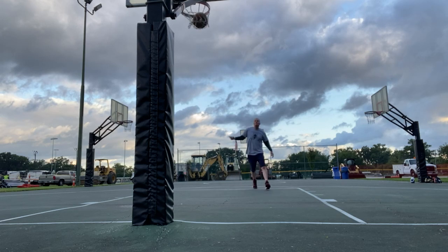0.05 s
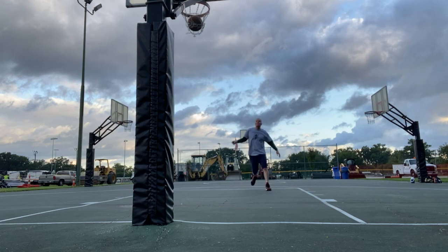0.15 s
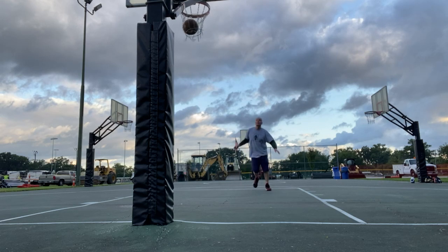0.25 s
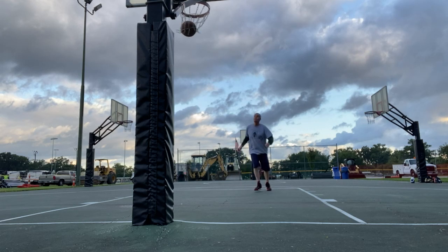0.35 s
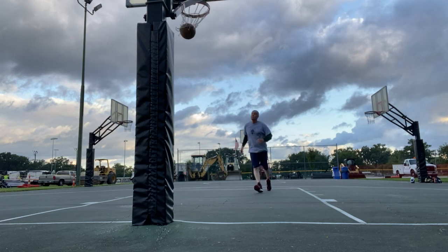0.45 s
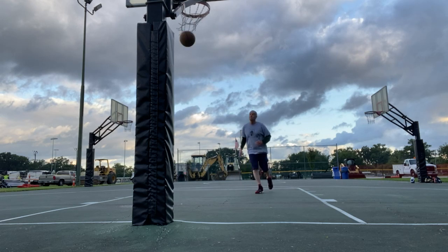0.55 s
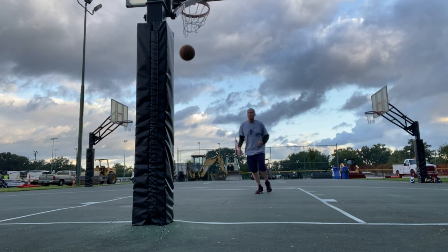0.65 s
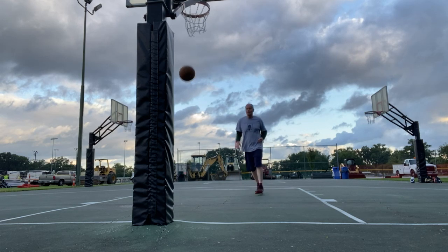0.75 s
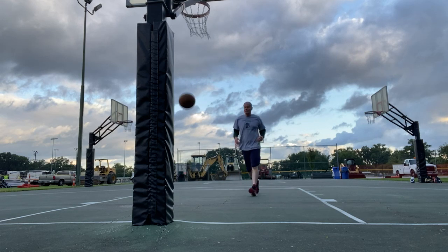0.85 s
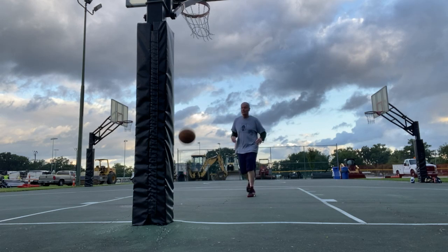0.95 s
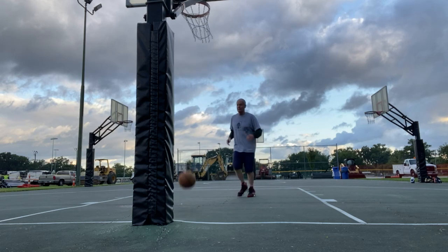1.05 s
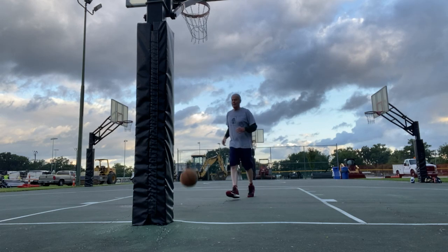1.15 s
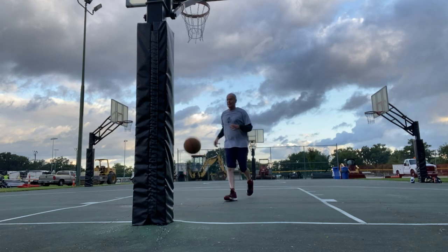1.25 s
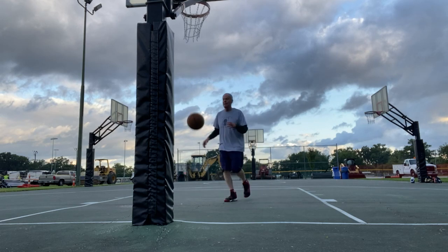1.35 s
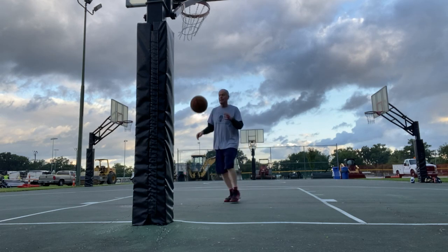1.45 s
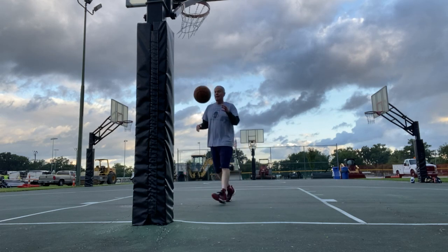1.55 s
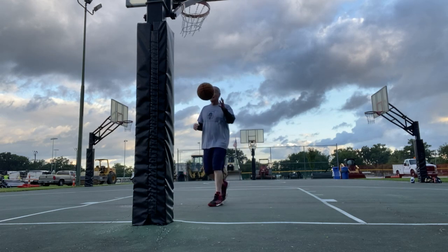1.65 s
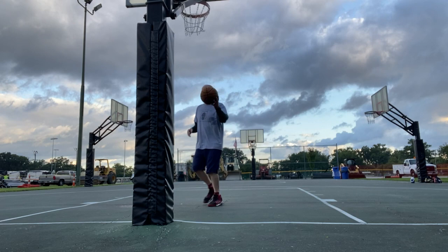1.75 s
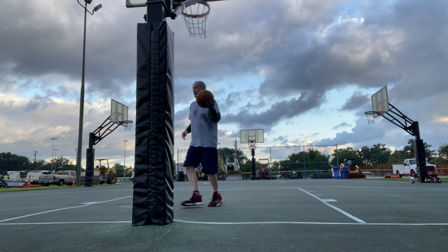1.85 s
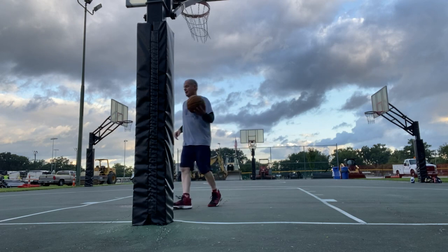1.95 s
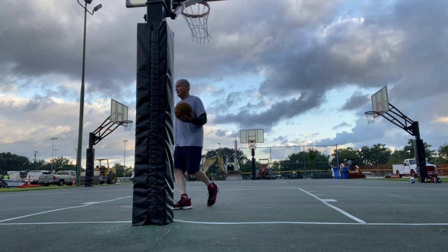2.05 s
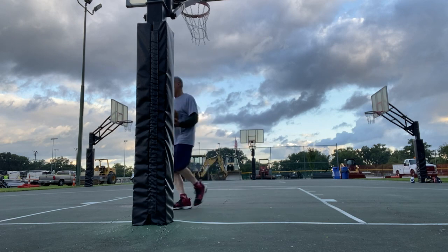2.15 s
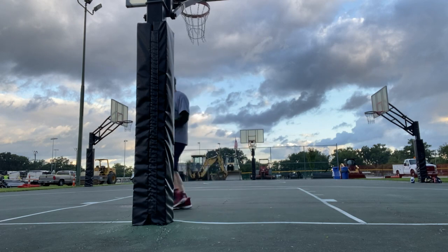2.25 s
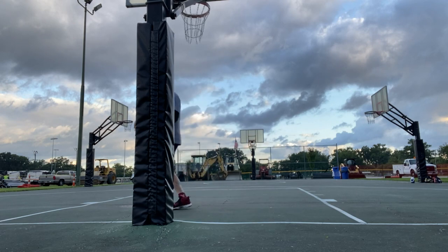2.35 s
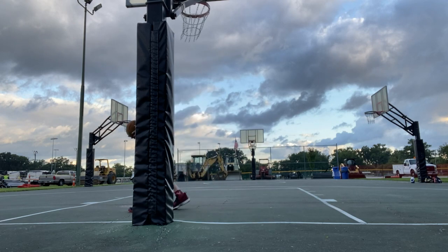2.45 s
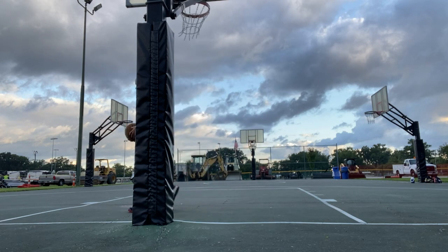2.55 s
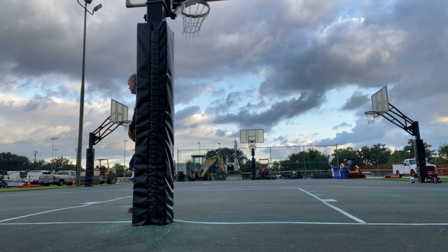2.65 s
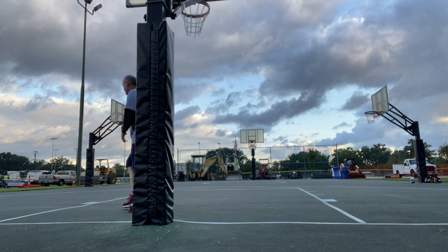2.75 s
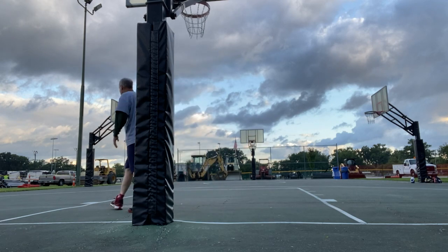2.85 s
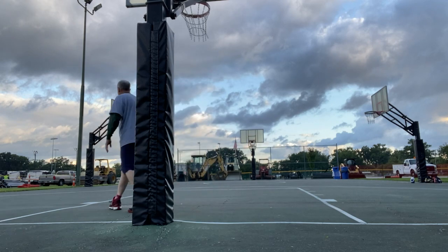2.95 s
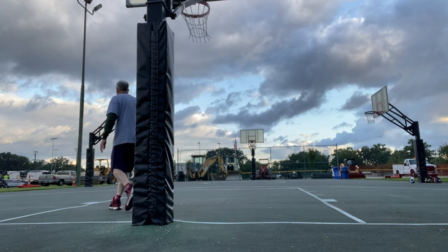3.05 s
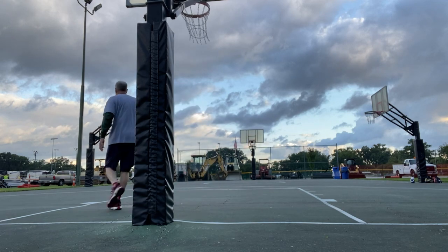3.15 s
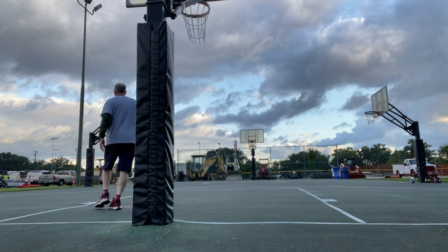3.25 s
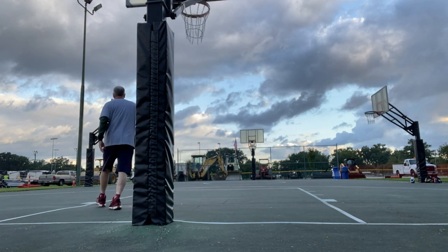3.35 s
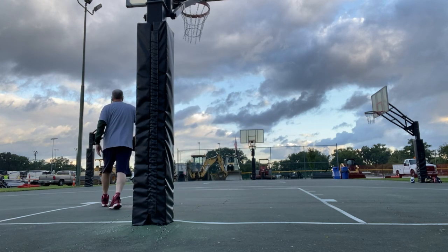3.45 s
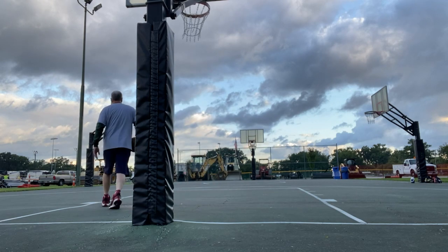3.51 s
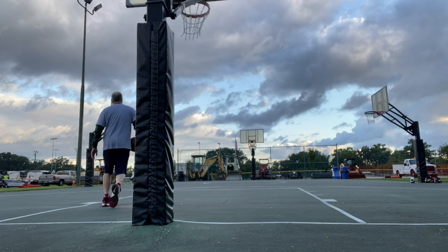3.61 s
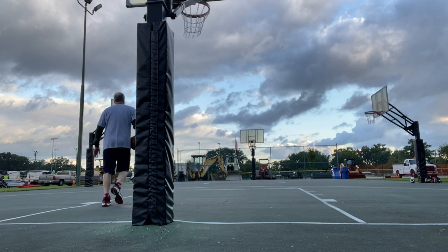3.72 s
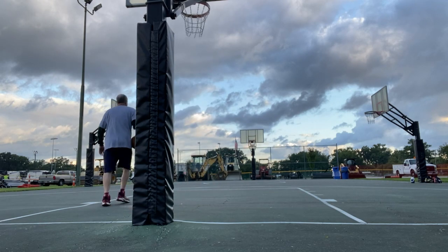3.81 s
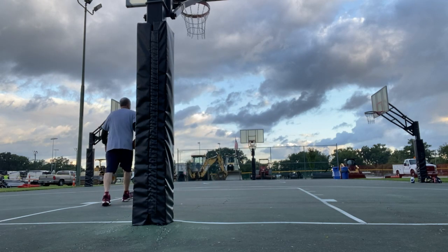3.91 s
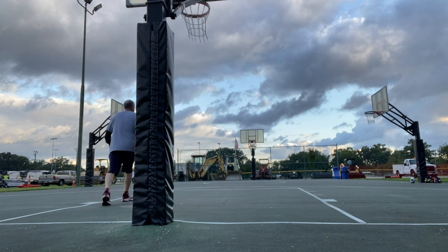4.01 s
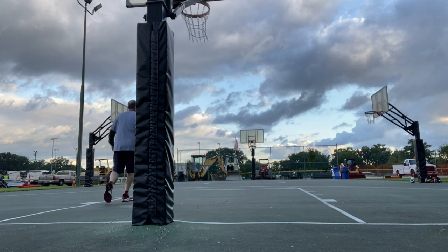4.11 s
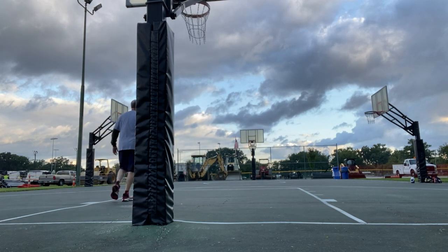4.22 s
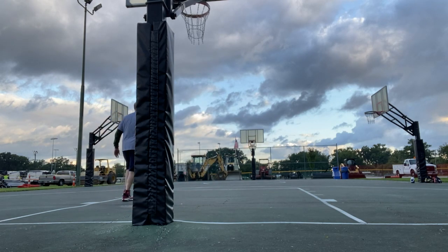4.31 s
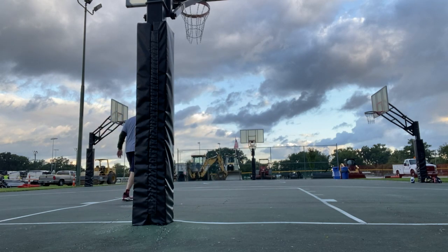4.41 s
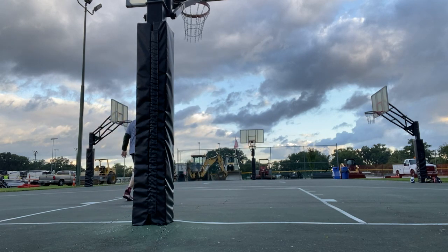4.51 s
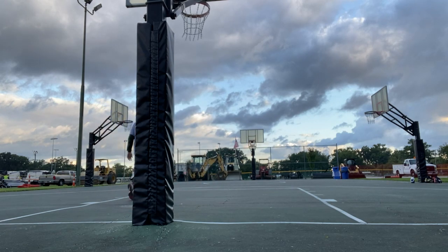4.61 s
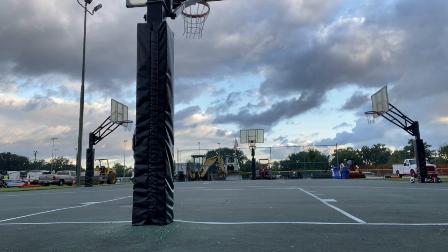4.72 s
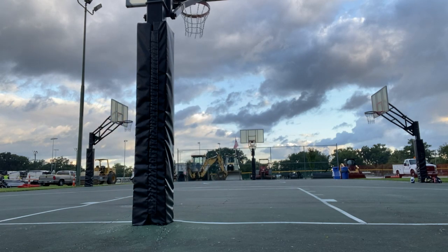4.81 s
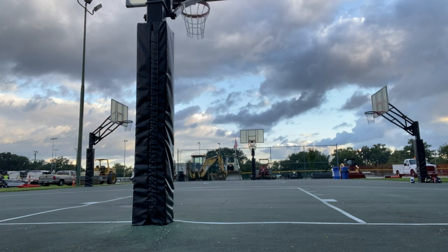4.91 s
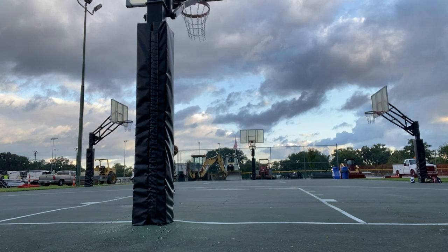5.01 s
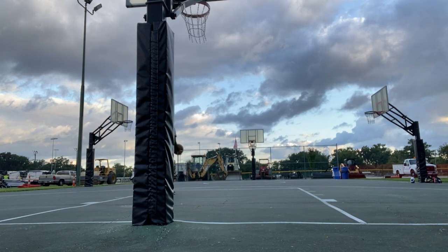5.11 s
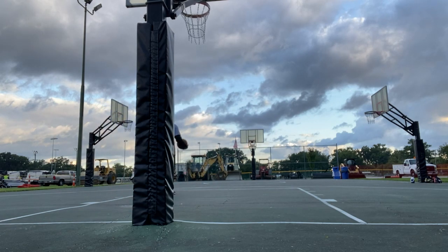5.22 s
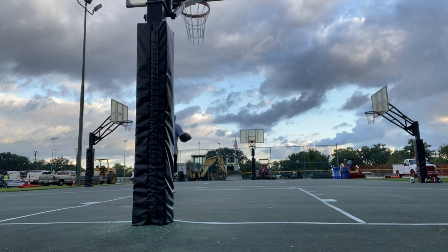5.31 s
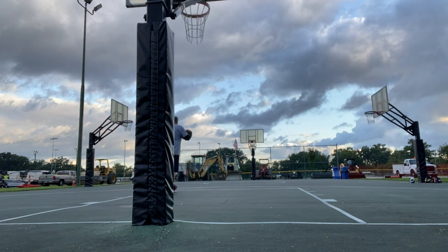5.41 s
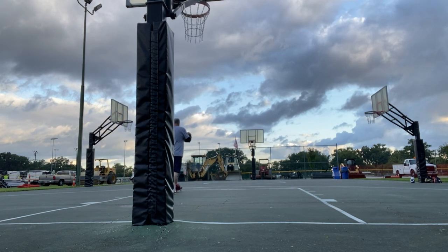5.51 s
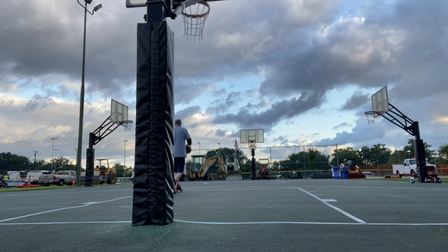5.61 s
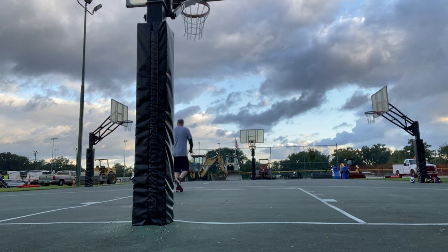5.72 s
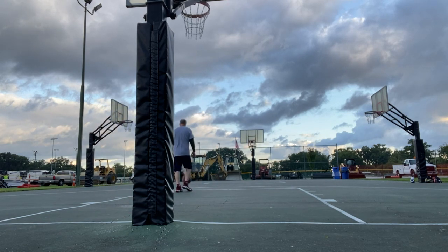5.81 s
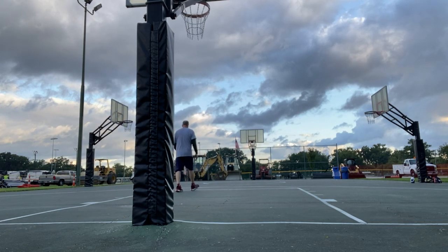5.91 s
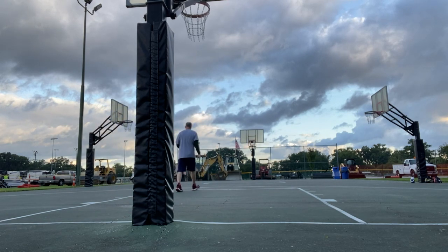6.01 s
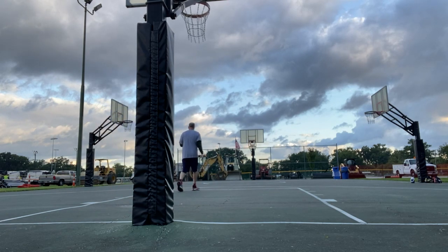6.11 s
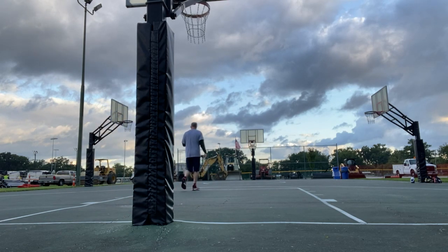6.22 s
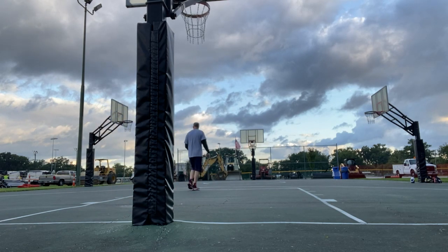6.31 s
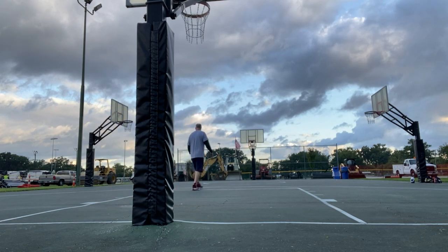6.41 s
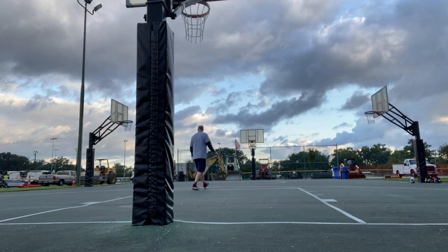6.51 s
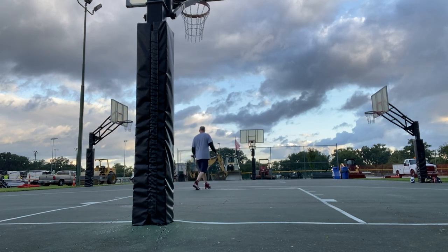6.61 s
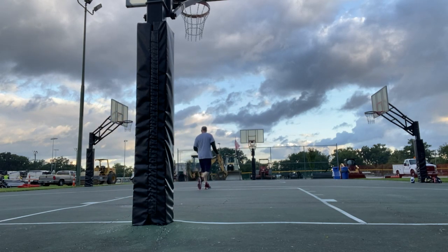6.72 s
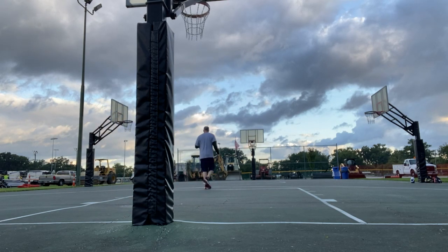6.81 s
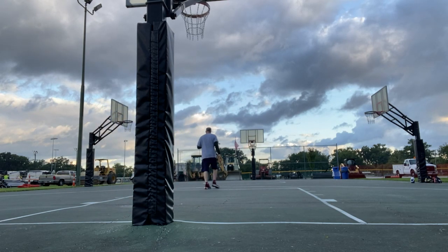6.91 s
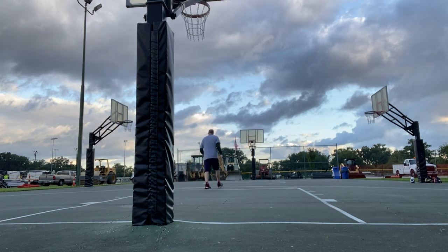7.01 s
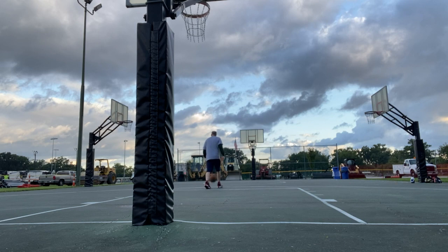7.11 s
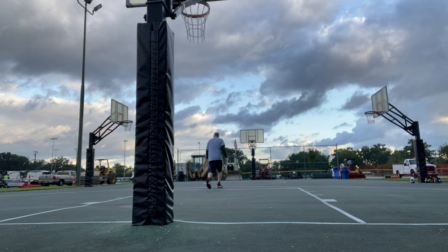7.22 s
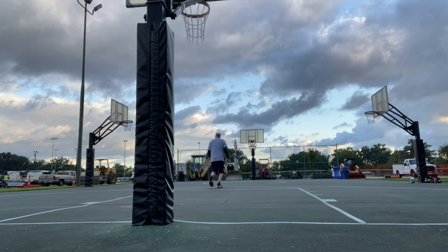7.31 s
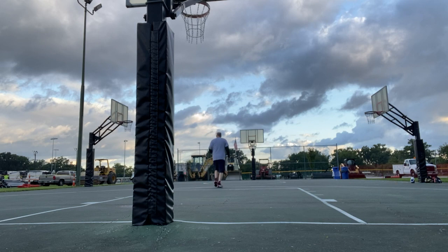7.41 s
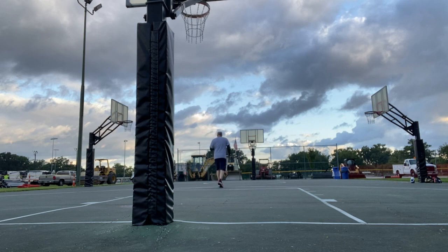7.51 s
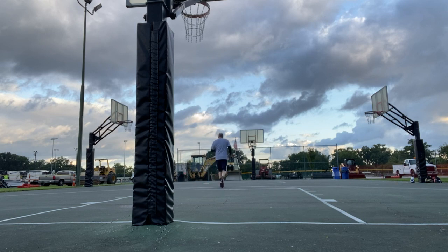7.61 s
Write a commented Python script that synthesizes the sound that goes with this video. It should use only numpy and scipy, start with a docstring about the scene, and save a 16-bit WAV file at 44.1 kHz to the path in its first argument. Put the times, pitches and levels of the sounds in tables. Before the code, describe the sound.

A basketball rattles through a rim, its steel net jingling, then one loud close bounce, a catch, and three later receding bounces over traffic rumble.

```python
"""On an outdoor court a basketball drops through a hoop: the rim rattles and the swinging steel net jingles.
The ball lands once close by and is caught; later it is bounced three times while the player walks away.
Knocks, links and ball are struck modes, pulses and shaped noise; brushes and rattles are random impacts.
Distant traffic, made of slowly varying noise, rumbles throughout with a faint sinusoidal machine whine.
Fences and trees return a soft echo of the bounces, made with decaying noise."""
import sys
import numpy as np
from scipy import signal
from scipy.fft import rfft, irfft, next_fast_len
from scipy.io import wavfile
from scipy.ndimage import map_coordinates

SR = 44100
rng = np.random.default_rng(int(sys.argv[2]) if len(sys.argv) > 2 else 0)


def master(y):
    """Save y as 16-bit WAV."""
    cut = np.clip(np.atleast_2d(y).T, -1, 1)
    pcm = np.round(cut * 32767)  # scale
    wavfile.write(sys.argv[1], SR, pcm.astype(np.int16))


N = 337806  # samples in the scene


def amp(db):
    """Level law: decibels to amplitude ratio."""
    return 10 ** (np.asarray(db) / 20)


def unit(x):
    """Normalization: scale to rms 1."""
    return x / np.sqrt(np.mean(x ** 2) + 1e-20)


def bell(t, centre, width):
    """Gaussian envelope: a smooth hump of height 1; width is the standard deviation."""
    return np.exp(-.5 * ((t - centre) / width) ** 2)


def along(points, hz):
    """Spectral envelope: (Hz, value) points joined on a log-frequency axis."""
    point_hz, value = np.transpose(points)
    return np.interp(np.log(hz + 1), np.log(point_hz + 1), value)


def curves(rows):
    """Slow modulation: each column after the time, interpolated to one value per sample."""
    s, *columns = np.transpose(rows)
    return [np.interp(np.arange(N) / SR, s, column) for column in columns]


def wobble(rate):
    """Random modulation: a smooth curve through rate random knots a second."""
    knots = rng.standard_normal(int(N * rate / SR) + 4)
    return map_coordinates(knots, [np.arange(N) * rate / SR])


def filtered(x, response):
    """Linear filtering: the spectrum of x times a complex response of frequency."""
    n = x.shape[-1]
    m = next_fast_len(n + SR // 2)
    hz = np.fft.rfftfreq(m, 1 / SR)
    return irfft(rfft(x, m) * response(hz), m)[..., :n]


def coloured(x, spectrum):
    """Spectral shaping: x weighted by (Hz, dB) points, at rms 1."""
    return unit(filtered(x, lambda hz: amp(along(spectrum, hz))))


def resonant(x, modes):
    """Forced resonance: x drives parallel (Hz, width Hz, dB) band-pass modes, at rms 1."""
    def response(f):
        return sum(amp(db) * 1j * f * width / (centre * centre - f * f + 1j * f * width)
                   for centre, width, db in modes)
    return unit(filtered(x, response))


def click(spectrum, bright_hz, lag_cycles, size=4096):
    """Dispersion: a pulse of peak 1 whose phase lag grows with log frequency, so low frequencies arrive late."""
    hz = np.fft.rfftfreq(size, 1 / SR)
    gain = amp(along(spectrum, hz)) / np.hypot(1, hz / bright_hz)
    lag = 2 * np.pi * lag_cycles * np.log(hz + 200)
    pulse = irfft(gain * np.exp(-1j * lag))
    pulse = np.roll(pulse, 10)[:size // 4]
    return pulse / np.abs(pulse).max()


def ring(modes, t, scatter_db, detune, build):
    """Free vibration: (Hz, dB, t60 s) modes with random strength and tuning, building up then decaying."""
    total = 0
    for hz, db, t60 in modes:
        decay = amp(db + scatter_db * rng.normal() - 60 * t / t60)
        onset = 1 - np.exp(-t / (build * t60))
        total = total + decay * onset * np.sin(2 * np.pi * hz * (1 + detune * rng.normal()) * t)
    return total


def add(track, s, x):
    """Superposition: mix x into the track from time s."""
    part = track[max(round(s * SR), 0):][:len(x)]
    part += x[:len(part)]


def placed(x, lead_ms, pan_db):
    """Interaural cues: left leads right by lead_ms and is pan_db louder."""
    side = np.array([[.5], [-.5]])
    return amp(side * pan_db) * filtered(x, lambda hz: np.exp(2j * np.pi * hz * side * lead_ms / 1000))


def contacts(rate, spread_db):
    """Random impact process: tiny impacts of uneven size and either sign, about rate a second."""
    hits = rng.random(N) < rate / SR
    return hits * rng.choice([-1, 1], N) * amp(spread_db * rng.standard_normal(N))


def clumps():
    """Clustered contact: an uneven gain, since loose parts touch in bunches."""
    clump_db, clumps_per_s = 2.5, 45
    return amp(clump_db * wobble(clumps_per_s))


# Left-right correlation of the far sound, limited to 0.96 in use: pitch_hz, likeness (0-1)
LIKENESS = [(60, 0.96), (200, 0.94), (500, 0.29), (1000, 0.47), (2000, 1), (4000, 0.31), (8000, 0.91),
            (14000, 0.21)]


def far_noise(spectrum):
    """Partial coherence: stereo noise of rms 1 from beyond the court, its likeness set by frequency."""
    a, b = coloured(rng.standard_normal((2, N)), spectrum)

    def turn(hz):
        return np.arccos(np.clip(along(LIKENESS, hz), -.96, .96)) / 2
    mid = filtered(a, lambda hz: np.cos(turn(hz)))
    side = filtered(b, lambda hz: np.sin(turn(hz)))
    return unit(np.array([mid + side, mid - side]))


# Engine rumble through time, before a common lift: time_s, level_db
RUMBLE_LEVEL = [(0, -33), (1.1, -32), (2.2, -33), (3.8, -35), (7.66, -34)]
# Hiss through time: time_s, level_db
HISS_LEVEL = [(0, -72.5), (2.2, -68), (4.7, -67), (7.66, -72.5)]
# Spectra of engine rumble, tyre roar and hiss: pitch_hz, level_db
RUMBLE_SPECTRUM = [(12, -57.5), (20, -32.5), (27, -23), (29, -18.5), (40, -15.5), (59, 1), (113, -3),
                   (145, -1), (167, -6.5), (198, -5.5), (264, -8), (333, -18.5), (375, -18.5), (450, -25),
                   (580, -51), (990, -120)]
ROAR_SPECTRUM = [(250, -34.5), (420, 0.5), (542, -4), (588, -3), (823, -2), (1370, -4), (1490, -6),
                 (1530, -5.5), (2830, -15.5), (4800, -29), (6240, -60), (10600, -120)]
HISS_SPECTRUM = [(3000, -54), (4500, -1.5), (5400, 1.5), (6700, 0), (8000, -6), (9400, -9.5), (10500, -27),
                 (13500, -15.5), (16000, -45.5)]
RUMBLE_LIFT_DB, RUMBLE_WAVER_DB = 3.5, .7
ROAR_DB, ROAR_FADE_DB_PER_S, ROAR_WAVER_DB = -44, 0.31, .5  # the tyre roar slowly recedes
WHINE_HZ, WHINE_DB, WHINE_WAVER_DB = 1441, -8.5, 1.3  # level against the roar


def traffic():
    """Superposed distant sources: rumble, roar and hiss as noise, and a whine of two wavering harmonics."""
    rumble_db, = curves(RUMBLE_LEVEL)
    hiss_db, = curves(HISS_LEVEL)
    roar_db = ROAR_DB - ROAR_FADE_DB_PER_S * np.arange(N) / SR
    rumble_gain = amp(rumble_db + RUMBLE_LIFT_DB + RUMBLE_WAVER_DB * wobble(11))
    rumble = placed(rumble_gain * far_noise(RUMBLE_SPECTRUM), lead_ms=0, pan_db=-1.95)
    roar_gain = amp(roar_db + ROAR_WAVER_DB * wobble(5))
    roar = placed(roar_gain * far_noise(ROAR_SPECTRUM), lead_ms=0, pan_db=-1.3)
    hiss = placed(amp(hiss_db) * far_noise(HISS_SPECTRUM), lead_ms=0, pan_db=-3)
    # the whine wavers in pitch both slowly and quickly
    phase = 2 * np.pi * np.cumsum(WHINE_HZ + 3 * wobble(14) + 4 * wobble(70)) / SR
    harmonics = np.sin(phase) + amp(-20.5) * np.sin(2 * phase)
    whine = amp(roar_db + WHINE_DB + WHINE_WAVER_DB * wobble(6.2)) * harmonics
    return placed(rumble + roar + hiss + whine, lead_ms=.136, pan_db=0)


# Hands on the ball and soles on the court: centre_s, level_db, length_s (standard deviation)
BRUSHES = [(1.397, -58.5, .002), (1.8, -59, 0.0055), (1.952, -49.5, 0.005), (1.965, -49, .008),
           (2.428, -58, 0.01), (2.528, -64.5, 0.0095), (5.65, -65, 0.013), (7.103, -59.5, 0.0026),
           (7.117, -57.5, .007)]
# Spectrum of the brushes: pitch_hz, level_db
BRUSH_SPECTRUM = [(100, -26), (500, -3.5), (2500, 0), (4000, -3), (5300, -12), (9000, -1.5), (10500, -23),
                  (13000, -7), (15500, -20)]
# Heavy footfalls: start_s, level_db
FOOTFALLS = [(1.269, -18.5), (1.501, -18), (1.911, -20.5), (2.321, -21), (4.288, -23)]


def player():
    """Friction and impact: brushes are bursts of tiny contacts, footfalls two low damped modes."""
    t = np.arange(N) / SR
    touch = sum(amp(db) * bell(t, s, length) for s, db, length in BRUSHES)
    brushes = touch * coloured(contacts(rate=1800, spread_db=5), BRUSH_SPECTRUM)
    ground = [(69.5, 1.2, 0.2), (92.9, -1.0, 0.39)]  # pitch_hz, level_db, t60_s
    thuds = np.zeros(N)
    for s, db in FOOTFALLS:
        thud = ring(ground, t[:SR // 2], scatter_db=0.5, detune=0.059, build=0.049)
        add(thuds, s, amp(db) * thud)
    return placed(brushes + thuds, lead_ms=-0.026, pan_db=-2.5)


# The ball knocking about in the hoop, levels before the trims of each part:
# start_s, backboard_db, rim_rattle_db, ball_bump_db, rim_ring_db
KNOCKS = [(0.003, -36, -36.5, -36, -49), (0.074, -40, -42.5, -34, -56), (0.179, -45, -57, -36, -64),
          (0.191, -49, -50.5, -32, -64), (0.268, -50.5, -48, -48, -53), (0.283, -46, -51, -39, -58),
          (0.315, -52, -39.5, -46, -61), (0.425, -45, -65, -37, -66), (0.47, -48.5, -53, -37, -59),
          (0.604, -54, -46.5, -50, -60)]
# The ball scraping round the rim: centre_s, level_db, length_s (standard deviation)
RIM_SCRAPES = [(0.03, -40.5, .024), (0.277, -47, 0.0172), (0.335, -49.5, .012), (0.49, -62.5, 0.041),
               (0.612, -56.5, .014)]
# Backboard modes: pitch_hz, width_hz, level_db
BOARD_MODES = [(343, 18, 3), (430, 22, -2), (480, 22, 4.5), (571, 22, 0), (593, 22, -0.5), (725, 32, 4.5),
               (780, 30, -6), (1185, 23, -4.5)]
# Ringing modes of the steel rim: pitch_hz, level_db, t60_s
RIM_RING_MODES = [(1182, 0.5, 0.67), (2215, -1, .7), (2654, -6, .4), (2930, -4, .5), (3342, -0.5, .45),
                  (3405, -5, .3), (4910, -13, .4)]
# Broad resonances of the rattled or scraped steel: pitch_hz, width_hz, level_db
STEEL_MODES = [(1952, 147, -7), (2112, 120, -7), (2750, 407, -9), (3370, 59.5, -2), (3800, 400, -16)]
# Spectra of the loose rattle and of rubber bumping steel: pitch_hz, level_db
RATTLE_SPECTRUM = [(60, -32), (200, -17.5), (400, 14), (800, 1.5), (1600, -5), (3200, -13.5), (5000, -27.5),
                   (8000, -35), (12000, -72.5)]
BUMP_SPECTRUM = [(100, -14), (220, 1), (400, -0.5), (620, 1.5), (950, -11.5), (1500, -13), (3000, -30),
                 (6000, -46)]
RATTLE_ATTACK_S, RATTLE_FADE_DB_PER_S = 0.0036, 158.5  # rattle after each knock
SHUDDER_DB, SHUDDER_FADE_DB_PER_S = -46.5, 22  # the hoop keeps trembling between knocks
STRIKE_DB = -4.5  # trim of the blow on the board
BUMP_T60_S = .075


def hoop():
    """Modal excitation: knocks ring board and rim, random taps rattle them, and friction scrapes the steel."""
    t = np.arange(N) / SR
    u = t[:SR]
    board, rim = (amp(SHUDDER_DB - SHUDDER_FADE_DB_PER_S * t) * clumps() for _ in range(2))
    knock = amp(-RATTLE_FADE_DB_PER_S * t) * (1 - np.exp(-t / RATTLE_ATTACK_S))
    # a mode's bandwidth fixes its decay time
    board_ring = [(hz, db, np.log(1000) / (np.pi * width)) for hz, width, db in BOARD_MODES]
    blows = np.zeros(N)
    for s, board_db, rim_db, bump_db, ring_db in KNOCKS:
        strike = ring(board_ring, u, scatter_db=2.5, detune=.025, build=0.011)
        add(blows, s, amp(board_db + STRIKE_DB) * strike)
        add(blows, s, amp(ring_db) * ring(RIM_RING_MODES, u, scatter_db=2, detune=.003, build=.003))
        bump = coloured(rng.standard_normal(len(u)), BUMP_SPECTRUM)
        add(blows, s, amp(bump_db - 60 * u / BUMP_T60_S) * bump)
        add(board, s, amp(board_db) * knock)
        add(rim, s, amp(rim_db) * knock)
    taps = contacts(rate=1300, spread_db=3.5)
    board_rattle = amp(-2.5) * board * resonant(taps, BOARD_MODES)
    rim_rattle = rim * (amp(-17.5) * resonant(taps, STEEL_MODES) + amp(-8) * coloured(taps, RATTLE_SPECTRUM))
    rub = sum(amp(db) * bell(t, s, length) for s, db, length in RIM_SCRAPES)
    scrape = rub * resonant(rng.standard_normal(N), STEEL_MODES)
    return placed(blows + board_rattle + rim_rattle + scrape, lead_ms=-0.03, pan_db=-2.0)


JINGLE_DB, JINGLE_FADE_DB_PER_S = -33.5, 24  # the links ring less as the swing dies away
CHATTER_DB, CHATTER_FADE_DB_PER_S = -38.5, 25.5  # dry rubbing of the links
BALL_LEAVES_S, RELEASE_S, SLACK_DB = 0.41, .03, 12.5  # the chatter drops once the ball is out of the net


def swing():
    """Damped swinging: jingle and chatter levels in dB fall steadily; the chatter drops as the ball falls free."""
    t = np.arange(N) / SR
    free = (1 + np.tanh((t - BALL_LEAVES_S) / RELEASE_S)) / 2
    jingle_db = JINGLE_DB - JINGLE_FADE_DB_PER_S * t
    return jingle_db, CHATTER_DB - CHATTER_FADE_DB_PER_S * t - SLACK_DB * free


# Modes of the steel links: pitch_hz, level_db, t60_s
LINK_MODES = [(8770, -13, .16), (8893, 0, .36), (8945, -6, .18), (8985, -3, .2), (9066, -7, .21),
              (9320, -19, .15), (11216, -12, .17), (11280, -14, .12), (11700, -24, .09)]
JOSTLE_S, JOSTLE_LOSS_DB = .013, 9.5  # mean gap, and loss from link to link
CLINK_T60_S = 0.2  # sets a clink's energy


def clink(t, count=3):
    """Successive impacts: a link jostles its neighbours, each later, weaker and differently tuned."""
    out = np.zeros(len(t))
    delays = np.cumsum(JOSTLE_S * rng.uniform(.5, 1.5, count))
    for k, s in enumerate(delays - delays[0]):
        link = ring(LINK_MODES, t, scatter_db=2.5, detune=.0012, build=.006 * (1 + 2 * k))
        add(out, s, amp(-JOSTLE_LOSS_DB * k) * link)
    return unit(out) * np.sqrt(np.mean(amp(-60 * t / CLINK_T60_S) ** 2))


# Harder strikes of the links, ring before a 3 dB cut: start_s, ring_db, tick_db
LINK_STRIKES = [(0.0014, -20.5, -38.5), (0.036, -21, -32.5), (0.0781, -17.5, -45), (0.1391, -18, -44),
                (0.19, -20.5, -35), (0.2084, -26, -45.5), (0.313, -20.5, -34.5), (0.343, -27.5, -42),
                (0.4514, -29.5, -56), (0.5123, -31, -49.5), (0.5896, -32.5, -44.5), (0.618, -29.5, -46),
                (0.6519, -32, -56.5), (0.735, -64, -64), (0.841, -31, -53), (0.965, -45, -63.5),
                (1.038, -42, -48), (1.1934, -46.5, -48.5), (1.2473, -37, -51), (1.425, -46, -80),
                (1.49, -33.5, -61), (1.8383, -43, -66)]
# Spectrum of ticks and chatter: pitch_hz, level_db
CHATTER_SPECTRUM = [(1000, -28.5), (2500, -1.5), (5000, -12), (7000, 0), (8700, 8.5), (10000, -19.5),
                    (12000, 9.5), (14800, 7), (15600, -23)]
TICK_T60_S = .055


def net():
    """Many small collisions: links chatter and jingle in clumps while the net swings; harder strikes ring out."""
    jingle_db, chatter_db = swing()
    rings, ticks, t = np.zeros(N), np.zeros(N), np.arange(SR // 2) / SR
    for s, ring_db, tick_db in LINK_STRIKES:
        add(rings, s, amp(ring_db - 3.0) * clink(t))
        tick = coloured(rng.standard_normal(len(t)), CHATTER_SPECTRUM)
        add(ticks, s, amp(tick_db - 60 * t / TICK_T60_S) * tick)
    widened = [(hz, 6.5 / t60, db) for hz, db, t60 in LINK_MODES]  # unlike links spread each mode
    bunching = clumps()
    rings += amp(jingle_db) * bunching * resonant(contacts(rate=550, spread_db=0.5), widened)
    touches = contacts(rate=2600, spread_db=3)
    ticks += amp(chatter_db) * bunching * coloured(touches, CHATTER_SPECTRUM)
    return placed(rings + ticks, lead_ms=-0.024, pan_db=0)


THUMP_HZ, SWEEP_HZ = 98.8, 1103  # final pitch of the thump, and how far above it the thump starts
SETTLE_S, DENT_QUICKENS_S = 0.00437, 0.0019  # a deep dent settles sooner
CREST_S, RISE_S, FALL_S = 0.01748, 0.0054, 0.0041  # crest just after lift-off
OVERTONE_RATIO, OVERTONE_DB = 2.365, -13.5  # a higher mode of the ball sinks along with the thump


def thump(t, dent):
    """Elastic rebound: the ball flattens and springs back in a few cycles that sink in pitch."""
    settle = max(SETTLE_S - DENT_QUICKENS_S * dent, 1 / SR)

    def cycles(time):
        return THUMP_HZ * time - SWEEP_HZ * settle * np.exp(-time / settle)
    phase = 2 * np.pi * (cycles(t) - cycles(CREST_S))
    rise = dent + (1 - dent) * bell(t, CREST_S, RISE_S)  # a deep dent starts louder
    swell = np.where(t < CREST_S, rise, bell(t, CREST_S, FALL_S))
    overtone = amp(OVERTONE_DB) * bell(t, 0.018, 0.0063) * np.cos(OVERTONE_RATIO * phase)
    return (swell * np.cos(phase) + overtone) * (1 - np.exp(-(t / 0.005) ** 2))


SHELL_SWEEP_HZ, SHELL_LIFE_S = 1364, .0036  # start of the chirp above its note; decay constant


def shell_chirp(t, settle_hz, glide=0.00093):
    """Dispersive bending waves: the high ones run round the shell first, then it settles on one note."""
    cycles = settle_hz * t + SHELL_SWEEP_HZ * glide * (1 - np.exp(-t / glide))
    return np.sin(2 * np.pi * cycles) * np.exp(-t / SHELL_LIFE_S) * (1 - np.exp(-t / glide))


# The ball on the ground; dent is depth 0-1, bright_hz the corner where the slap's treble falls away:
# start_s, thump_db, slap_db, lift_off_knock_db, ping_db, dent, bright_hz, shell_db, shell_hz, crack_db, crack_hz
LANDINGS = [(1.1326, -7, -6, -26.5, -49.5, 1, 13030, -18.5, 974, 2, 3600),
            (5.8322, -9, -20, -26, -61, 0.27, 12030, -20.5, 560, 0.5, 2600),
            (6.5158, -11.5, -21.5, -38, -58.5, 0.3, 5500, -16, 920, 6, 3000),
            (7.2033, -12, -23.5, -27, -66.5, 0.2, 13700, -18.5, 950, 3, 3900)]
# Spectra of the slap, the crumpling rubber and the quivering shell: pitch_hz, level_db
SLAP_SPECTRUM = [(300, -15), (1100, 3.5), (1500, 7), (2000, -1), (2500, -0.5), (4200, 3), (5100, -6),
                 (6500, -2), (8800, -5.5), (11000, -14.5), (12500, -6), (15000, -14), (16000, -24)]
RUBBER_SPECTRUM = [(100, -28), (330, -6), (650, -3), (1100, 5), (2000, -5.5), (4000, -22), (9000, -36),
                   (16000, -42)]
QUIVER_SPECTRUM = [(150, -21), (330, 0), (470, 2.5), (680, -15), (1100, -15.5), (2000, -24.5),
                   (5000, -57.5)]
# Modes of the air inside the ball: pitch_hz, level_db, t60_s
AIR_MODES = [(1900, 3, 0.15), (2760, -4, 0.57), (3190, -1, .38), (3380, -2.5, 0.75), (3600, -5, 0.54),
             (3850, -11, .3), (3960, -12, .35), (4170, -14, .35), (4290, -7.5, 0.83), (4727, -10.5, .35),
             (5260, -11, .35)]
CONTACT_S = .0128  # time the ball stays on the ground
KNOCK_HZ, KNOCK_S, POP_S = 1245, .0013, .0005  # the shell knocks as it springs off; widths of knock and pop
QUIVER_DB, QUIVER_T60_S = -22, 0.08  # the shell after lift-off, against the thump
ROUGHNESS_DB = -21  # starting level of the noise mixed into the slap's pulse
CRACK_OCTAVES = .25  # width of the crack's hump in the slap spectrum


def ball():
    """Impact and release: slap, shell chirp and thump, then a lift-off knock and the faint ring of the air inside."""
    body, slaps, t = np.zeros(N), np.zeros(N), np.arange(SR // 2) / SR
    for (s, thump_db, slap_db, knock_db, ping_db, dent, bright_hz,
         shell_db, shell_hz, crack_db, crack_hz) in LANDINGS:
        add(body, s, amp(thump_db) * thump(t, dent) + amp(shell_db) * shell_chirp(t, shell_hz))
        # the rubber crumples during contact and the dent pops out at lift-off
        crumple = amp(-34.0) * bell(t, 0.0057, 0.014) + amp(-25.5) * bell(t, CONTACT_S, 0.0013)
        rubber = amp(thump_db) * crumple * coloured(rng.standard_normal(len(t)), RUBBER_SPECTRUM)
        pop = amp(thump_db - 14.5) * bell(t, CONTACT_S, POP_S)
        knock = bell(t, CONTACT_S, KNOCK_S) * np.cos(2 * np.pi * KNOCK_HZ * (t - CONTACT_S))
        add(body, s, rubber - pop - amp(knock_db) * knock)
        # the freed shell quivers for a moment while the air inside rings on
        quiver = coloured(rng.standard_normal(len(t)), QUIVER_SPECTRUM)
        add(body, s + CONTACT_S, amp(thump_db + QUIVER_DB - 60 * t / QUIVER_T60_S) * quiver)
        # the ball is not quite round, so each air mode splits into a beating pair
        ping = sum(ring(AIR_MODES, t, scatter_db=2.5, detune=.004, build=.08) for _ in range(2))
        add(body, s, amp(ping_db) * ping)
        # a little decaying noise is mixed into the slap's pulse; each landing cracks at its own pitch
        noise_gain = amp(ROUGHNESS_DB - 60 * t / 0.0075) + amp(-42 - 60 * t / 0.075)
        roughness = rng.standard_normal(len(t)) * noise_gain
        roughness[0] = 1  # the pulse itself
        slap_hz = np.geomspace(300, 16000, 48)
        crack = crack_db * bell(np.log2(slap_hz / crack_hz), 0, CRACK_OCTAVES)
        cracked_slap = np.column_stack([slap_hz, along(SLAP_SPECTRUM, slap_hz) + crack])
        pulse = click(cracked_slap, bright_hz, lag_cycles=1.8)
        add(slaps, s, amp(slap_db) * signal.fftconvolve(roughness, pulse))
    return placed(body, lead_ms=-.02, pan_db=-1.4) + placed(slaps, lead_ms=-0.024, pan_db=-3.0)


# Spectrum of the echo: pitch_hz, level_db
ECHO_SPECTRUM = [(80, -8), (300, -0.5), (1200, 5), (3000, 1), (5000, 1), (8500, 3), (14000, -5.5)]


def surroundings(x, t60=0.5):
    """Diffuse reflection: a decaying noise tail as scatter, with a soft cloud of echoes from the fences."""
    t = np.arange(SR // 2) / SR
    scatter = amp(-1.0 - 60 * t / t60) * (1 - np.exp(-t / .012))
    fences = bell(t, .1, .028)
    tail = (scatter + fences) * coloured(rng.standard_normal((2, len(t))), ECHO_SPECTRUM)
    return signal.fftconvolve(x, tail / np.linalg.norm(tail[0]), axes=1)[:, :N]


# Echo gain through time, against the direct bounces: time_s, level_db
ECHO_LEVEL = [(1.5, -27.5), (5.8, -17.5), (7.2, -19.5)]


def scene():
    """Superposition: traffic, player, hoop, net and ball; the later bounces have a stronger share of echo."""
    bounces = ball()
    echo_db, = curves(ECHO_LEVEL)
    echo = amp(echo_db) * surroundings(bounces)
    return traffic() + player() + hoop() + net() + bounces + echo


TOP_HZ = 15850


def record(dry):
    """Band limiting: nothing passes at or above TOP_HZ."""
    return filtered(dry, lambda hz: hz < TOP_HZ)


dry = scene()
out = record(dry)
master(out)
```